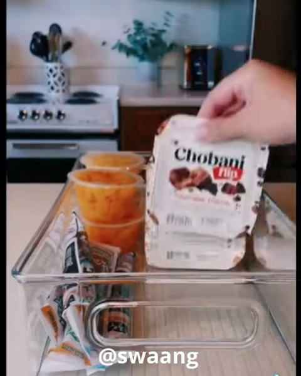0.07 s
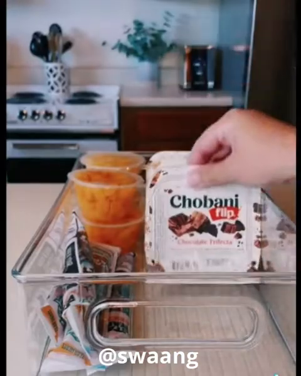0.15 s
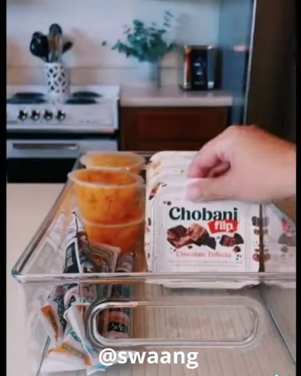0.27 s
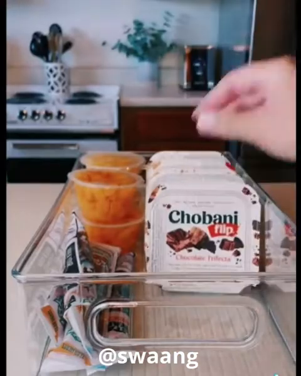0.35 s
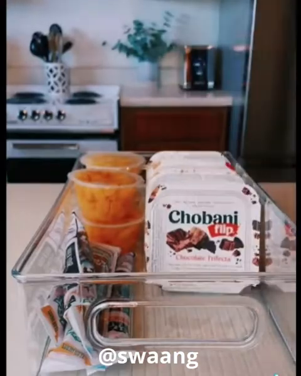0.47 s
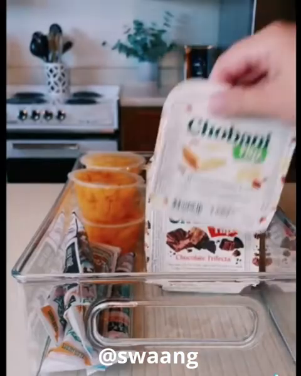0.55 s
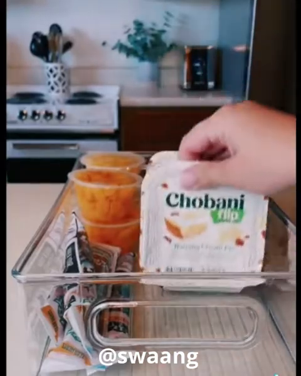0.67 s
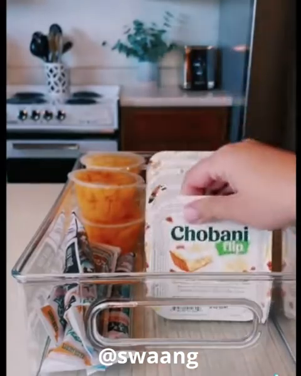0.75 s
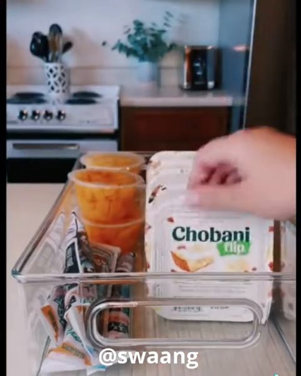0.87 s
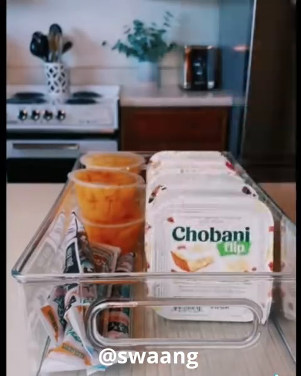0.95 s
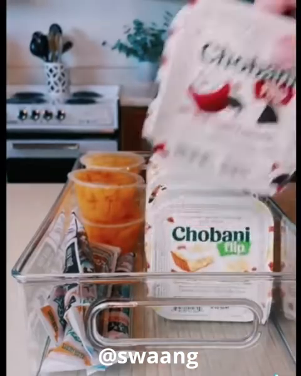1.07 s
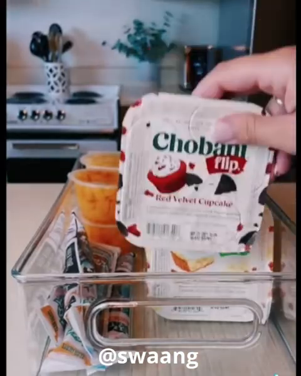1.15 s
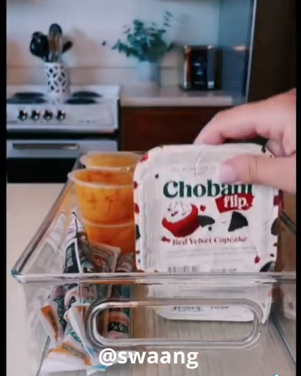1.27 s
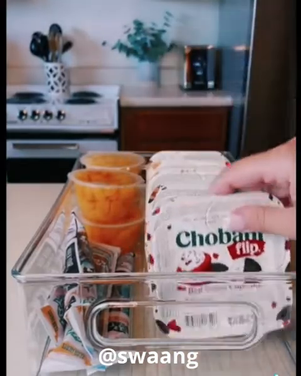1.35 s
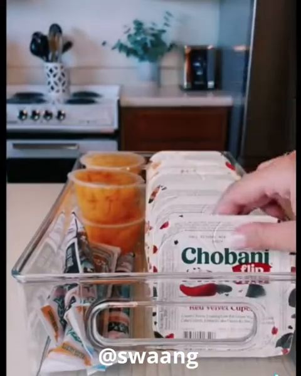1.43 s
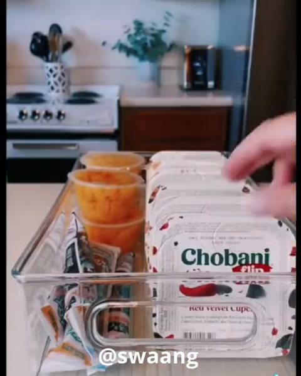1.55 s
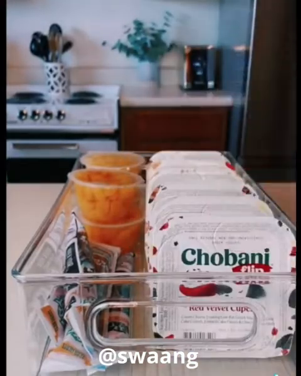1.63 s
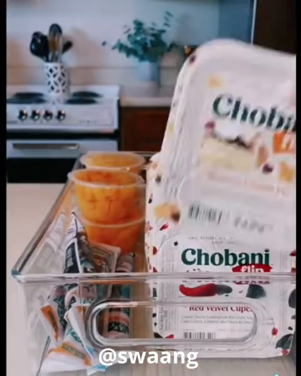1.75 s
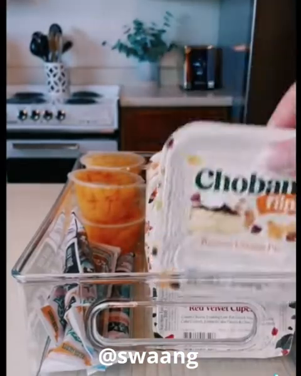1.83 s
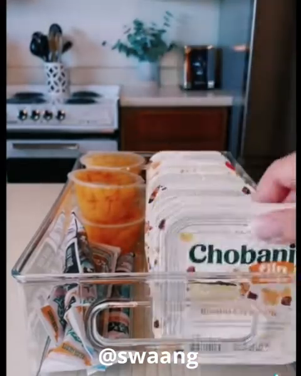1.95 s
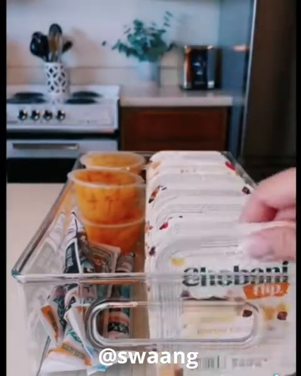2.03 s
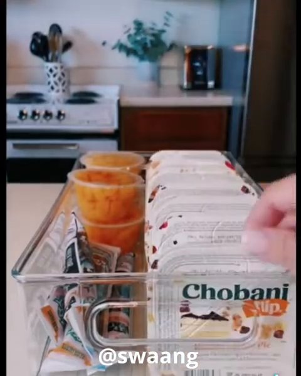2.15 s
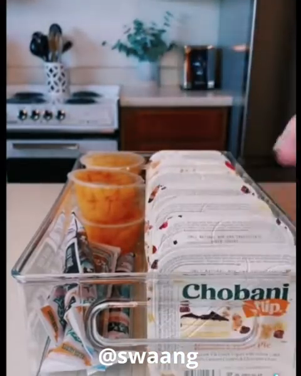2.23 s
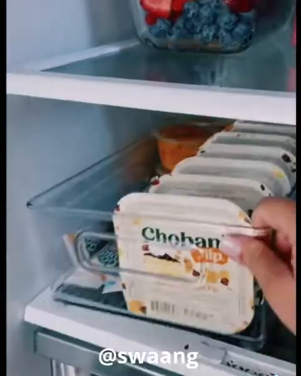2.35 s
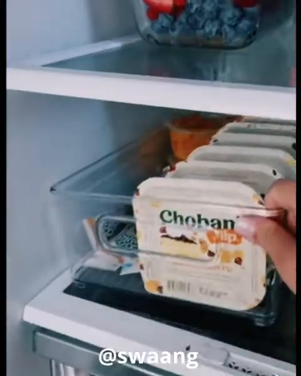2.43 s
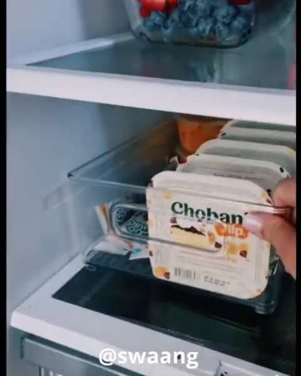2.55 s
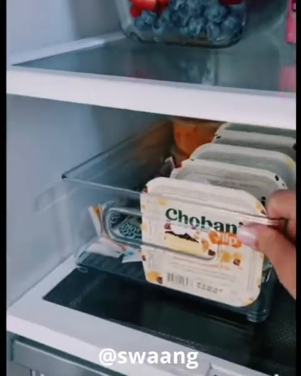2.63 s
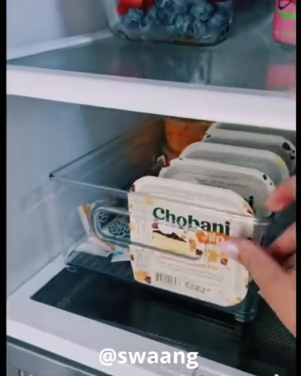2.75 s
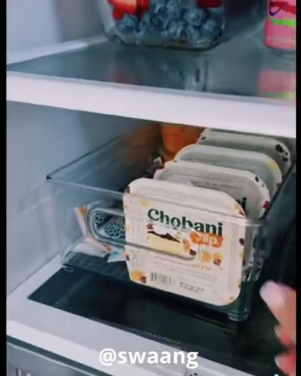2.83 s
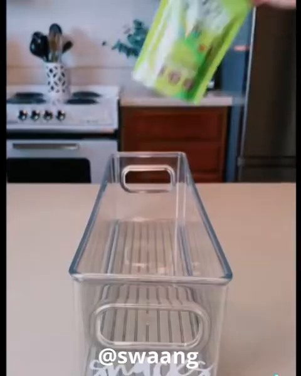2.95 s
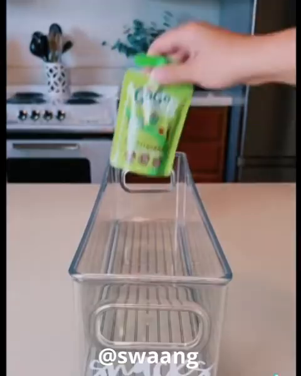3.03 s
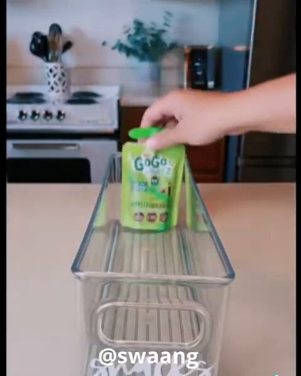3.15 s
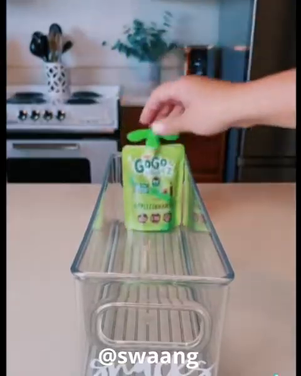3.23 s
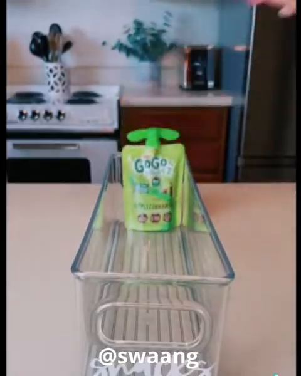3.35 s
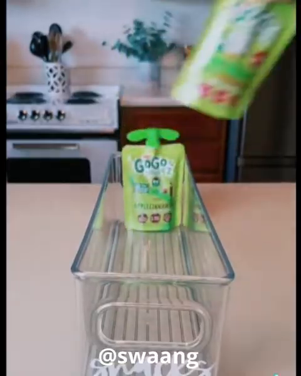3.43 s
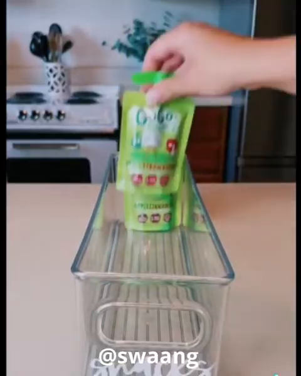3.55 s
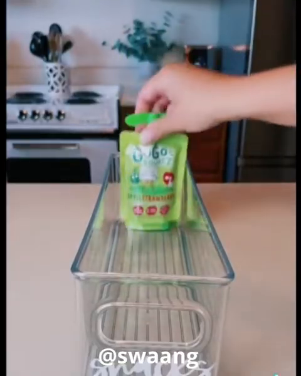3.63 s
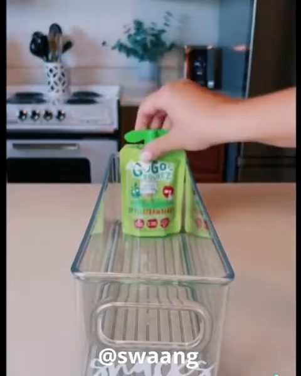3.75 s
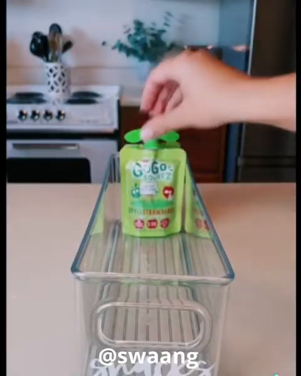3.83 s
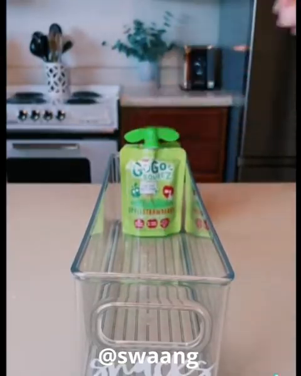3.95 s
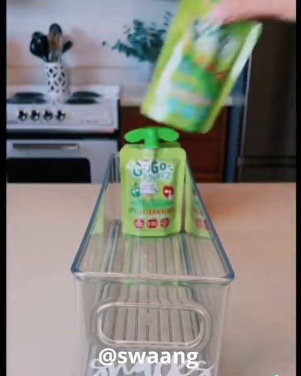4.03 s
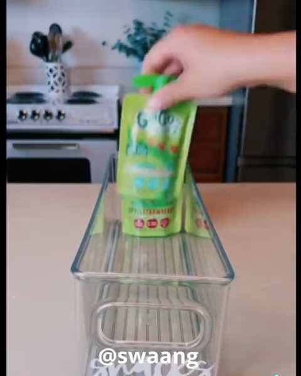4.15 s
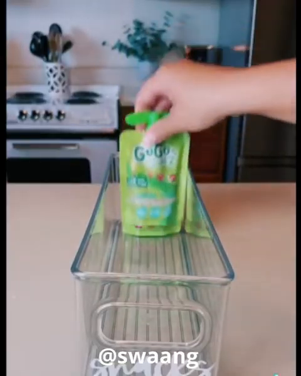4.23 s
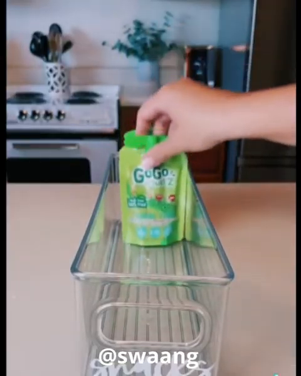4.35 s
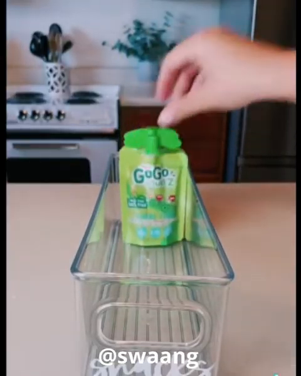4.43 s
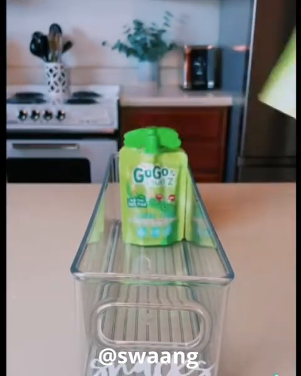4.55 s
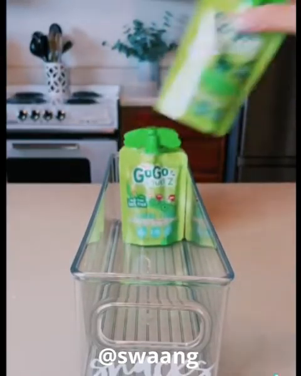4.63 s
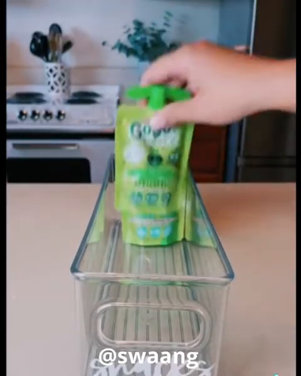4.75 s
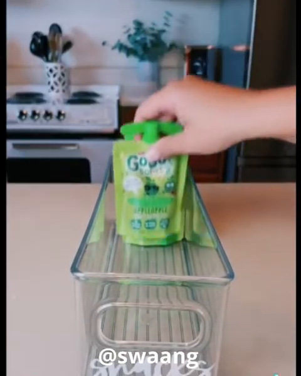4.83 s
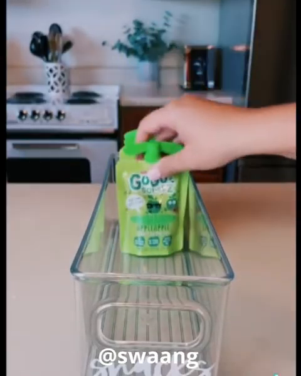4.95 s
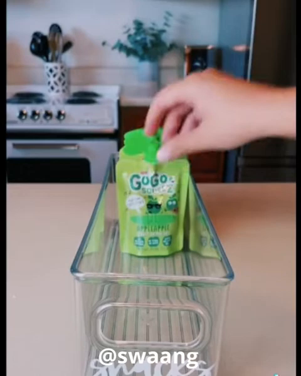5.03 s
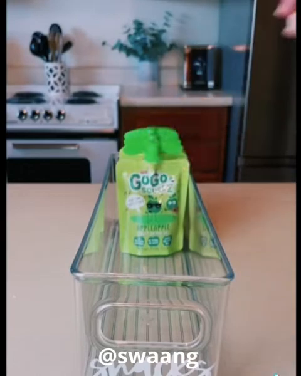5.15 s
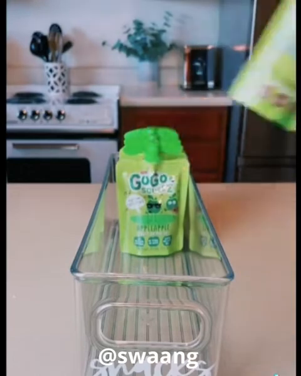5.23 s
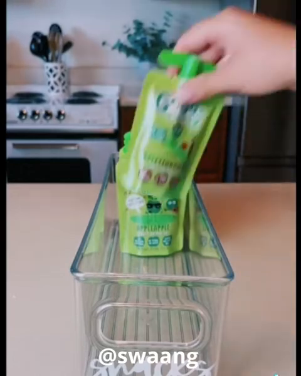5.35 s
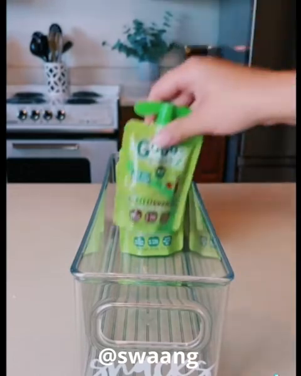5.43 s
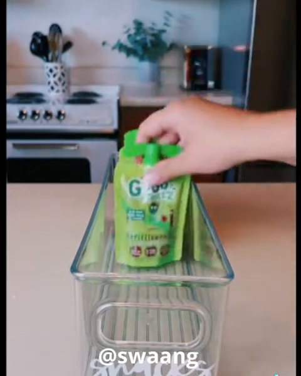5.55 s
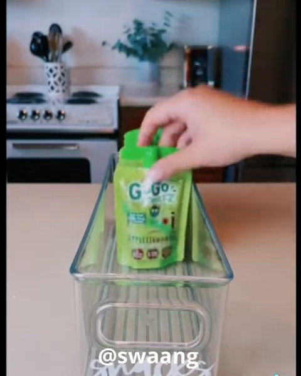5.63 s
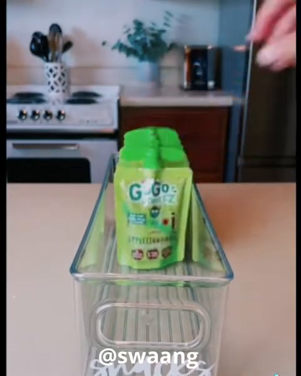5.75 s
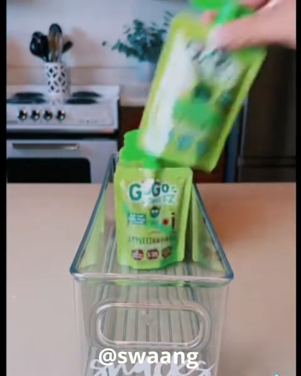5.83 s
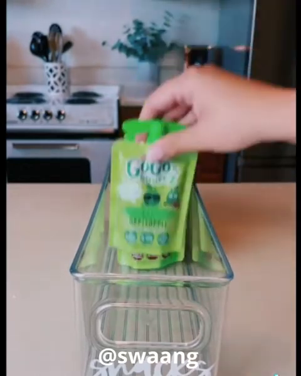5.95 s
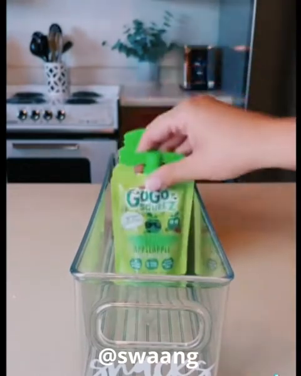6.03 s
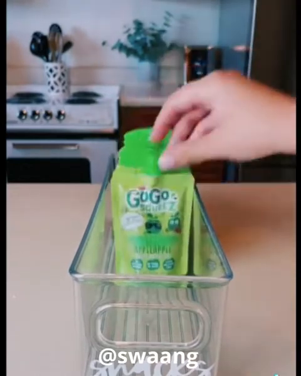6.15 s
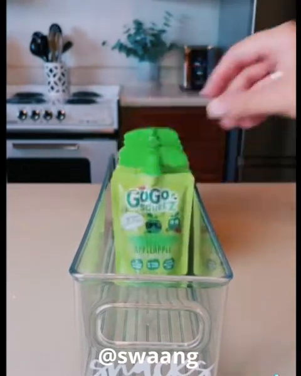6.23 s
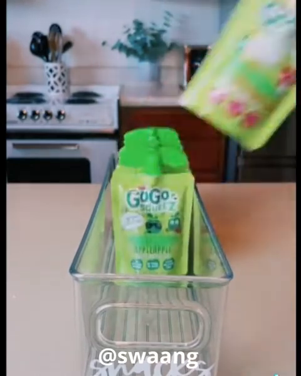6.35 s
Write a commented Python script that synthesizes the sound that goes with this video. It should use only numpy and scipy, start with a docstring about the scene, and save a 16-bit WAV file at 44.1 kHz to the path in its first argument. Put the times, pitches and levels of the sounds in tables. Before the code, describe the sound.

In a small kitchen, foil-lidded yogurt cups are set into a plastic bin with quick light clacks, crackly slides and a few tiny squeaks. The bin then scrapes and knocks onto a fridge shelf, ending in the loudest clack. After that, soft pouches drop into another bin in small clusters of taps and crinkles. Everything sounds close and, at first, slightly sped up, over a faint appliance hum that shifts in pitch.

```python
"""Plastic knocks and rings as a fridge is restocked, sped up: foil-lidded yogurt cups slide into a bin,
the bin scrapes onto a shelf, then fruit pouches drop into a second bin. Each contact rings the plastic
and a small kitchen; sliding foil and film crackle and settle. Brief squeaks and a thin steady whine at
the fridge lie over a faint appliance hum. Each stretch has its own motor pitch and its own speed,
which shifts the air and the cup and pouch modes."""
import sys
import numpy as np
from scipy import signal
from scipy.fft import rfft, irfft
from scipy.io import wavfile
from scipy.ndimage import uniform_filter1d

SR = 44100
rng = np.random.default_rng(int(sys.argv[2]) if len(sys.argv) > 2 else 0)


def output_pcm(signal):
    """Save a mono or channel-first signal as 16-bit PCM at the path in sys.argv[1].

    Samples are clipped to [-1, 1] before scaling.
    """
    pcm = np.clip(np.atleast_2d(signal).T, -1, 1) * 32767
    wavfile.write(sys.argv[1], SR, np.round(pcm).astype(np.int16))


N = 281787
TIME_S = np.arange(N) / SR

# borders of the five registers: thump, knock, body, clack, tick
EDGES_HZ = [165, 480, 1200, 2800, 6000, 15500]
BANDS = [signal.butter(3, EDGES_HZ[k:k + 2], "band", fs=SR, output="sos") for k in range(5)]
# stretches of constant speed: start_s, speed_ratio, air_db, motor_hz, motor_db
STRETCHES = [(0, 1.535, -54.5, 358.7, -61.5), (2.353, 1.386, -50.5, 206, -55.5),
             (2.976, 1.734, -54, 402, -54), (3.47, 1.2, -54.5, 297, -56.5), (4.066, 1.0, -54.5, 240.8, -59),
             (5.265, 0.99, -54, 245.6, -54.5), (5.883, 0.99, -54, 243.6, -52)]
# kitchen air at natural speed: frequency_hz, relative_db
AIR_SPECTRUM = [(30, -36.5), (64, -19), (110, -10), (155, 2.5), (215, -11), (260, -11), (330, -9),
                (480, -13), (590, -25), (720, -24.5), (1100, -37), (1700, -39), (3200, -50), (9000, -57)]
# squeaks, then (last row) a steady whine: start_s, length_s, from_hz, to_hz, width_hz, level_db
SQUEAKS_AND_WHINE = [(0.53, .1, 7700, 5470, 1000, -71), (1.13, 0.042, 6500, 5900, 700, -79),
                     (1.633, .04, 8300, 8400, 1000, -74), (2.02, .04, 7560, 7400, 1000, -65),
                     (2.438, 0.031, 2720, 2697, 100, -51), (2.757, .21, 3430, 3380, 59.6, -81)]
# packs sliding, and the bin scraping on the shelf: start_s, length_s, strength_db, tilt_db_per_register
SLIDES = [(0.115, 0.11, -60.5, -1.5), (0.212, 0.13, -64.5, -4), (0.51, 0.1, -77.5, 6),
          (0.672, 0.26, -68.5, 0.5), (0.826, 0.071, -67.5, -6), (1.057, 0.075, -53.5, 2.5),
          (1.28, 0.25, -70, 1.5), (1.427, 0.09, -63, 0), (1.552, 0.024, -61, 5), (1.725, 0.074, -54.5, 4.5),
          (1.96, 0.071, -71.5, 1), (2.088, 0.088, -62.5, 3), (2.34, 0.3, -70.5, -0.5),
          (2.409, 0.074, -60.5, -7.5), (3.169, 0.057, -59, 6), (3.24, 0.029, -56, -15.5),
          (3.693, 0.12, -63.5, -0.5), (4.256, 0.19, -69.5, 1), (4.512, 0.096, -84.5, -12.5),
          (4.91, 0.038, -56, 4), (5.498, 0.21, -58.5, -3), (6.027, 0.028, -63, 1.5), (6.117, 0.11, -72, -4),
          (6.172, 0.13, -77.5, -6)]
# container modes before speed and ring scaling: pitch_hz, relative_db, t60_s
CUP_MODES = [(132.6, 9.5, 0.13), (265, -5, 0.08), (411.6, -6, 0.27), (627, 12.5, 0.022), (797, -2.5, 0.033),
             (1000, 5.5, 0.013), (1370, -3, 0.068), (1650, -8, 0.053), (2262, 0.5, 0.052),
             (3100, -2, 0.013)]
BIN_MODES = [(248, -6.5, 0.077), (308.7, 2, 0.043), (442.8, -6.5, 0.024), (544, -6.5, 0.054),
             (686.3, -15, 0.044), (792.4, -17.5, .04), (1440, -4, 0.017), (1590, 2, 0.02),
             (1800, -2.5, 0.014), (1970, 1, 0.02), (2635, 2, .022), (2970, -4.5, 0.035), (3470, -7, 0.037),
             (4420, -2.5, 0.009)]
POUCH_MODES = [(173, -3, 0.057), (245, 6, 0.044), (382, 3.5, 0.041), (640.4, 6.5, 0.038), (794, -12, 0.034),
               (1570, -1, 0.047), (1833, -9, 0.18), (1963, -4, 0.036), (2190, -1.5, 0.052),
               (2440, -8.5, 0.054), (3300, -22, 0.0089), (4500, -1.5, 0.035)]
# colour of a contact of middling hardness: knock_db, body_db, clack_db, tick_db
CUP_COLOUR_DB = [-9, 1, -0.5, -6.5]
BIN_COLOUR_DB = [-15.5, 0, -1.5, -10]
POUCH_COLOUR_DB = [-4.5, 0.5, -2, -8]
# contacts: start_s, strength_db, hardness_db_per_register, weight_db, spot_hz
CUP_HITS = [(0.1207, -55.5, 3.5, -14, 1650), (0.132, -58.5, -10.5, -21, 3380),
            (0.2674, -43.5, -3, -21, 1130), (0.284, -59, -10, -28, 2640), (0.3662, -41.5, -2, -17, 6140),
            (0.381, -58.5, 6, -25, 3870), (0.6805, -53.5, 0.5, -22, 5000), (0.7413, -75.5, -16, 11, 2540),
            (0.8087, -51, 0, -14, 2520), (0.826, -53.5, -1, -5, 1720), (1.0716, -54, 8, -26, 5100),
            (1.2746, -49.5, -1, -32, 3070), (1.4043, -42.5, -2.5, -18, 3213), (1.448, -49.5, 9, 1.5, 3470),
            (1.4557, -40, -2.5, -11, 1010), (1.466, -47.5, 3.5, -12, 3100), (1.473, -51, -4, -13, 1740),
            (1.5111, -59.5, 0, -3, 3130), (1.57, -67, -8, -12, 1570), (1.9286, -54, -5.5, -19, 3100),
            (1.982, -53.5, 0.5, -27, 3250), (2.1172, -47, 4.5, -7.5, 7500), (2.219, -63.5, 1, -12, 1510)]
BIN_HITS = [(2.4045, -39, 0, 4.5, 3610), (2.4918, -36, -4, -18.5, 2662), (2.5645, -55, -4, 15, 620),
            (2.6005, -41.5, 5.5, -4.5, 8180), (2.6045, -47, -4, 24.5, 3260), (2.618, -45, 0, -10, 2160),
            (2.6697, -22.5, -2.5, -1.5, 4460), (2.7807, -62, 2, -2, 2800), (2.795, -60.5, 1.5, 10.5, 2640)]
POUCH_HITS = [(3.1853, -41, -0.5, -25, 3440), (3.189, -45, -3.5, -23, 3440), (3.205, -48, -6.5, -21, 1430),
              (3.2177, -46, 4, -24, 4300), (3.2501, -43, 2.5, -24, 7900), (3.6836, -55.5, 5, -11.5, 4370),
              (3.7121, -67, -6, 17.5, 1860), (3.751, -38, 0, -8.5, 5950), (3.8383, -67, -1, -8, 2960),
              (3.9291, -66.5, 0.5, -15, 3040), (4.0877, -76, -6, 21, 1530), (4.2758, -64, 3, 7.5, 4730),
              (4.3157, -65, -3, 12, 2190), (4.3446, -41, -1, -6, 1930), (4.42, -60.5, -4.5, -3, 2124),
              (4.9692, -37.5, -1.5, -26, 2190), (4.9728, -49, -2, 0.5, 1840), (5.034, -62.5, -1, -14, 2134),
              (5.061, -65, -4, 5, 2220), (5.6083, -43.5, -4, -18, 1960), (5.6566, -44.5, -2, -6, 2344),
              (5.7325, -58.5, -0.5, 1, 2660), (5.897, -77.5, -12.5, 9, 986), (6.0767, -54, -2.5, 3, 1540),
              (6.091, -40, -3.5, -37, 1990), (6.1055, -45.5, -2.5, -2, 2300),
              (6.2054, -62.5, -1, -17, 2870)]
# colour of a slide: body_db, clack_db, tick_db
SLIDE_COLOUR_DB = [-4.5, -1.5, 0]
LEFT_RIGHT = np.array([[1], [-1]])


def undb(db):
    return 10 ** (np.asarray(db) / 20)


def unit_rms(x):
    return x / np.sqrt(np.mean(x ** 2) + 1e-20)


def decay(t, t60_s):
    return np.exp(-np.log(1000) * t / max(t60_s, 1e-3))


def filtered(x, order, hz, kind="low"):
    return signal.sosfilt(signal.butter(order, hz, kind, fs=SR, output="sos"), x)


def add(out, start_s, x):
    i = max(int(start_s * SR), 0)
    out[:, i:i + x.shape[1]] += x[:, :max(N - i, 0)]


def stereo_noise(size, apart_hz=1700):
    """Noise at two close points: alike in the bass, drifting apart in the treble."""
    mid, side = rng.standard_normal((2, size))
    return mid + 0.54 * filtered(side, 1, apart_hz, "high") * LEFT_RIGHT


def speed_at(time_s):
    return [speed for start_s, speed, *_ in STRETCHES if start_s <= time_s + .02][-1]


def nearness(hz, width_octaves=0.78):
    """How near each register, knock to tick, lies to a pitch (0-1)."""
    centres_hz = np.sqrt(np.multiply(EDGES_HZ[1:-1], EDGES_HZ[2:]))
    return np.exp(-(np.log2(centres_hz / hz) / width_octaves) ** 2)


def rumble(top_hz=70, level_db=-88):
    """Faint low rumble, independent left and right."""
    return undb(level_db) * unit_rms(filtered(rng.standard_normal((2, N)), 2, top_hz))


def hum(second_ratio=1.077, second_db=-3, waver_db=3.5, overlap_s=.006, whine_db=-86, hiss_db=-87):
    """Rushing air and two beating motor tones per stretch; a thin whine in the first; faint hiss."""
    out = np.zeros((2, N))
    air_hz, spectrum_db = np.transpose(AIR_SPECTRUM)
    ends_s = [row[0] for row in STRETCHES[1:]] + [N / SR]
    for (start_s, speed, air_db, motor_hz, motor_db), end_s in zip(STRETCHES, ends_s):
        size = int((end_s - start_s + overlap_s) * SR)
        t = np.arange(size) / SR
        hz = np.fft.rfftfreq(size, 1 / SR) + 1
        colour = undb(np.interp(np.log(hz / speed), np.log(air_hz), spectrum_db))
        air = unit_rms(irfft(rfft(stereo_noise(size, apart_hz=1740)) * colour, size))
        waver = undb(waver_db * np.interp(t * 12, np.arange(64), rng.standard_normal(64)))
        phase = 2 * np.pi * motor_hz * t
        motor = unit_rms(waver * (np.sin(phase) + undb(second_db) * np.sin(second_ratio * phase)))
        crossfade = np.sin(np.pi / 2 * np.minimum(np.minimum(t, t[::-1]) / overlap_s, 1))
        add(out, start_s, (undb(air_db) * air + undb(motor_db) * motor) * crossfade)
    whine = unit_rms(filtered(stereo_noise(N), 2, [2470, 2530], "band")) * (TIME_S < ends_s[0])
    return out + undb(whine_db) * whine + undb(hiss_db) * unit_rms(stereo_noise(N))


def room(dry, wet_db, t60s_s):
    """Adds dense reflections from counter, cupboards or fridge walls; level and decay per register."""
    t = np.arange(int(.45 * SR)) / SR
    reflections = stereo_noise(len(t), apart_hz=1300) * np.clip((t - .003) / .004, 0, 1)
    tail = 0
    for k, sos in enumerate(BANDS):
        band = signal.sosfilt(sos, reflections) * decay(t, t60s_s[k])
        share = (EDGES_HZ[k + 1] - EDGES_HZ[k]) / (SR / 2)
        tail += undb(wet_db[k]) * unit_rms(band) * np.sqrt(share / len(t))
    return dry + signal.fftconvolve(dry, tail, axes=1)[:, :N]


def settling(count=4, loudest_db=-74, spread_db=5):
    """Tiny ticks, thinning out, as the packs relax from each slide."""
    out = np.zeros((2, N))
    t = np.arange(int(.02 * SR)) / SR
    for start_s, length_s, *_ in SLIDES:
        for lateness, octaves, softness in rng.random((count, 3)):
            hz = 2400 * 2 ** octaves
            burst = stereo_noise(len(t)) * decay(t, t60_s=.025)
            tick = unit_rms(filtered(burst, 2, [hz / 1.5, hz * 1.5], "band"))
            delay_s = length_s / 2 + .12 / speed_at(start_s) * lateness ** 2
            add(out, start_s + delay_s, tick * undb(loudest_db - spread_db * softness))
    return out


def squeaks_and_whine():
    """Brief hoarse squeaks, most of them falling, and a thin steady whine at the fridge."""
    out = np.zeros((2, N))
    for start_s, length_s, from_hz, to_hz, width_hz, level_db in SQUEAKS_AND_WHINE:
        size = int(length_s * SR)
        roughness = unit_rms(filtered(rng.standard_normal(size), 2, width_hz / 2))
        tone = np.sin(2 * np.pi * np.cumsum(np.linspace(from_hz, to_hz, size)) / SR)
        add(out, start_s, undb(level_db) * np.hanning(size) * roughness * tone * np.ones((2, 1)))
    return out


def slides(grain_db=3.6, grains_per_s=600, snags_per_s=50, film_hz=(2350, 4700, 7300), film_db=2,
           rasp_db=5.5, rise_s=0.015, stop_s=0.014):
    """Stick-slip of sliding packs and the bin scraping on the shelf: edges snag, taut film resonates."""
    out = np.zeros((2, N))
    for start_s, length_s, strength_db, tilt_db in SLIDES:
        lift_db = rasp_db * nearness(hz=2300 * speed_at(start_s))[1:]
        levels_db = strength_db + np.array(SLIDE_COLOUR_DB) + tilt_db * np.array([-1, 0, 1]) + lift_db
        t = np.arange(int(length_s * SR)) / SR
        grains = undb(grain_db * np.minimum(rng.exponential(size=len(t)), 4))
        grip = grains[(t * grains_per_s).astype(int)]
        snags = (rng.random(len(t)) < snags_per_s / SR) * rng.uniform(12, 40, len(t))
        crackle = stereo_noise(len(t)) * grip + snags
        film = sum(signal.lfilter(*signal.iirpeak(hz, Q=6, fs=SR), crackle) for hz in film_hz)
        crackle += undb(film_db) * film
        rasp = sum(undb(db) * unit_rms(signal.sosfilt(sos, crackle))
                   for sos, db in zip(BANDS[2:], levels_db))
        swell = np.minimum(t / rise_s, 1) * np.exp(-1.7 * np.maximum(t - rise_s, 0) / length_s)
        stop = np.minimum((length_s - t) / stop_s, 1)
        add(out, start_s, swell * stop * rasp)
    return out


def register_levels(colour_db, strength_db, hardness_db, weight_db, spot_hz, lift_db=5, spill_db=-11):
    """Hardness tilts a contact to the treble, the struck spot lifts its register, weight thumps."""
    tilt_db = hardness_db * (np.arange(4) - 1.5)
    knock_db, *upper_db = strength_db + np.array(colour_db) + tilt_db + lift_db * nearness(spot_hz)
    thump_db = strength_db + weight_db
    knock_db = 20 * np.log10(np.hypot(undb(knock_db), undb(thump_db + spill_db)))
    return np.array([thump_db, knock_db, *upper_db])


def contact(modes, levels_db, rattle_db, rattle_t60_s, snap_db, flex_s, press_s=0.0005):
    """A snap, a short rattle and ringing plastic; the thump comes late, as the whole wall must flex."""
    t = np.arange(int(.14 * SR)) / SR
    rattle = undb(rattle_db) * decay(t, rattle_t60_s)
    snap = undb(snap_db) * decay(t, t60_s=0.0023)
    vibration = stereo_noise(len(t), apart_hz=1200) * (rattle + snap)
    for hz, db, t60_s in modes:
        detune, gain, turn, spread = rng.standard_normal(4)
        # short waves arrive out of step left and right
        lag_rad = min(hz / 1500, 1) * (.5 + .2 * spread) * LEFT_RIGHT
        phase = 2 * np.pi * hz * (1 + 0.017 * detune) * t + lag_rad + turn * min(hz / 1000, 2)
        vibration += undb(db + 1.138 * gain) * decay(t, t60_s) * np.sin(phase)
    out = 0
    for k, (sos, db) in enumerate(zip(BANDS, levels_db)):
        rise_s, head_s = (flex_s, .016) if k == 0 else (press_s, .008)
        attack = 1 - np.exp(-(t / rise_s) ** 2)
        band = signal.sosfilt(sos, vibration * attack)
        head_rms = np.sqrt(np.mean(band[:, :int(head_s * SR)] ** 2))
        out += undb(db) * band / head_rms
    return out


def contacts(hits, modes, colour_db, pan_db, ring_scale, spot_db, rattle_db, natural_rattle_t60_s,
             snap_db, flex_s, follow_speed=True, lead_s=.0006):
    """Each hit rings the container and the struck spot; pan_db leans left, overall or per register."""
    out = np.zeros((2, N))
    sides_db = np.reshape(pan_db, (-1, 1, 1)) * LEFT_RIGHT / 2
    for start_s, strength_db, hardness_db, weight_db, spot_hz in hits:
        speed = speed_at(start_s) if follow_speed else 1
        ringing = [(hz * speed, db, t60_s / speed * ring_scale) for hz, db, t60_s in modes]
        ringing.append((spot_hz, spot_db, 0.019 * ring_scale))
        levels_db = register_levels(colour_db, strength_db, hardness_db, weight_db, spot_hz)
        stereo_db = levels_db[:, None, None] + sides_db
        hit = contact(ringing, stereo_db, rattle_db, natural_rattle_t60_s / speed, snap_db, flex_s)
        add(out, start_s - lead_s, hit)
    return out


def scene():
    """Cups, bin and pouches in the kitchen, over the hum."""
    cups = contacts(CUP_HITS, CUP_MODES, CUP_COLOUR_DB, pan_db=0, ring_scale=0.77, spot_db=10.5,
                    rattle_db=10, natural_rattle_t60_s=0.045, snap_db=12.5, flex_s=0.0011)
    bin_on_shelf = contacts(BIN_HITS, BIN_MODES, BIN_COLOUR_DB, pan_db=[2, 0.5, 4, 2.5, 1],
                            ring_scale=0.93, spot_db=7.5, rattle_db=7, natural_rattle_t60_s=0.03,
                            snap_db=5.5, flex_s=0.0033, follow_speed=False)
    pouches = contacts(POUCH_HITS, POUCH_MODES, POUCH_COLOUR_DB, pan_db=-0.5, ring_scale=0.72,
                       spot_db=10, rattle_db=6.5, natural_rattle_t60_s=0.048, snap_db=21.5, flex_s=0.0031)
    small_sounds = slides() + settling() + squeaks_and_whine()
    return (room(cups + small_sounds, wet_db=[9, -4, -7, -9.5, -9.5], t60s_s=[.089, .1, .11, .074, .12])
            + room(bin_on_shelf, wet_db=[-16, -7, -19.5, -20, -15.5], t60s_s=[.22, .1, .15, .17, .13])
            + room(pouches, wet_db=[-1, -3.5, -11, -13, -13.5], t60s_s=[.28, .19, .23, .22, .14])
            + hum() + rumble())


def record(dry, dull_hz=11000, top_hz=15600, gap_from_s=2.956, gap_to_s=2.976):
    """The microphone softens the highest treble; a blink of silence before the pouches; the top is cut."""
    soft = filtered(dry, 1, dull_hz)
    gate = uniform_filter1d(1. * ((TIME_S < gap_from_s) | (TIME_S > gap_to_s)), size=24)
    return signal.sosfilt(signal.ellip(8, .2, 70, top_hz, fs=SR, output="sos"), soft * gate)


dry = scene()
out = record(dry)
output_pcm(out)
```